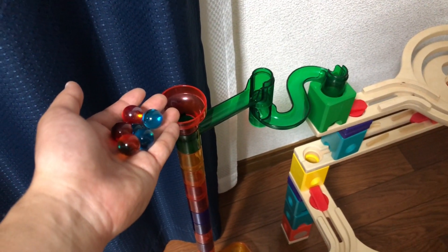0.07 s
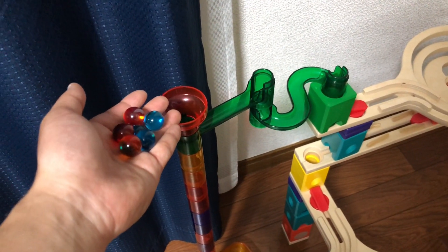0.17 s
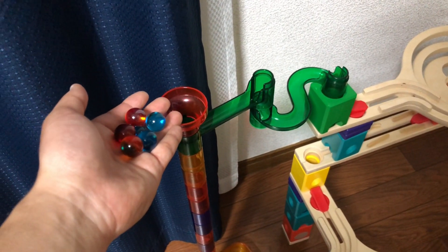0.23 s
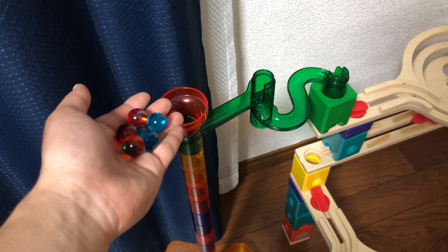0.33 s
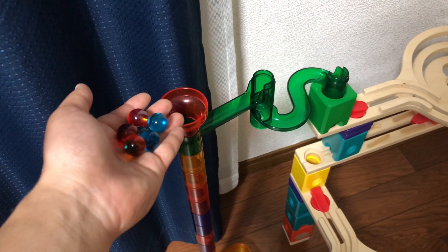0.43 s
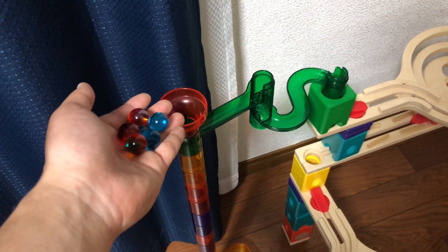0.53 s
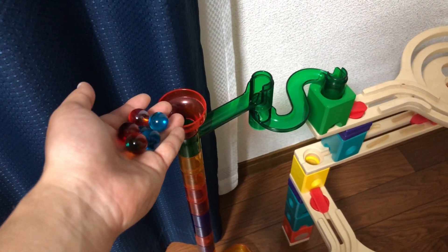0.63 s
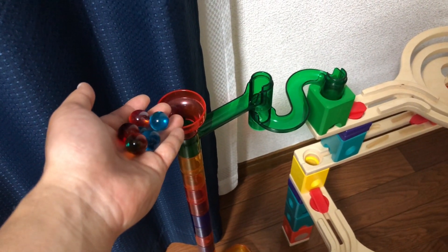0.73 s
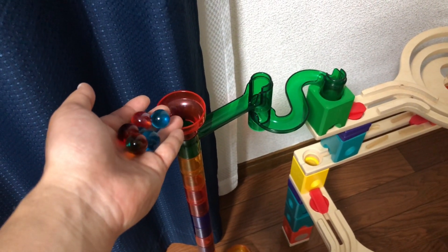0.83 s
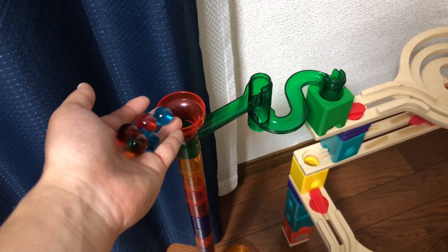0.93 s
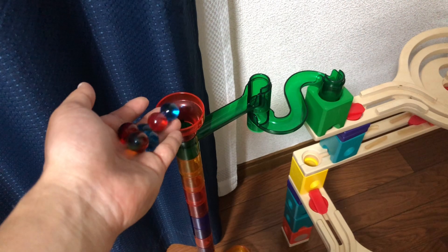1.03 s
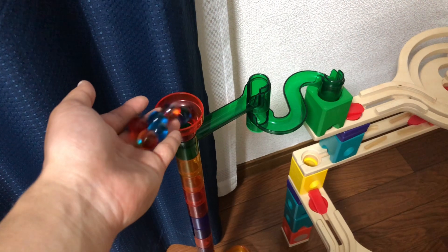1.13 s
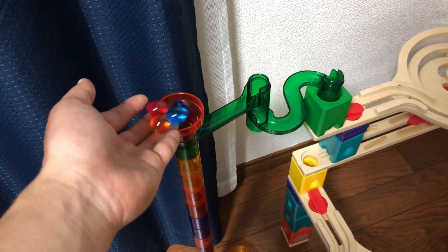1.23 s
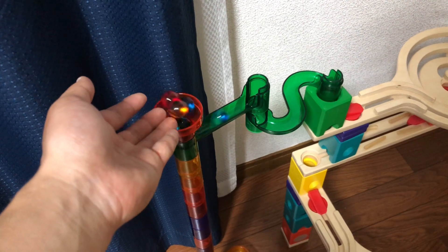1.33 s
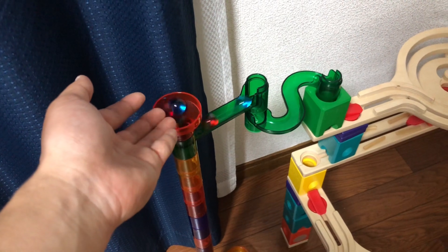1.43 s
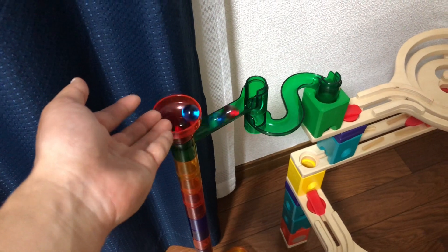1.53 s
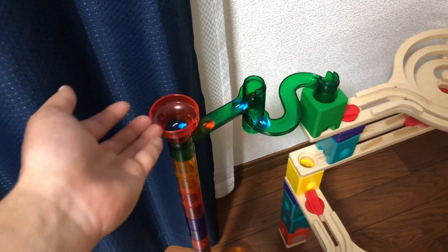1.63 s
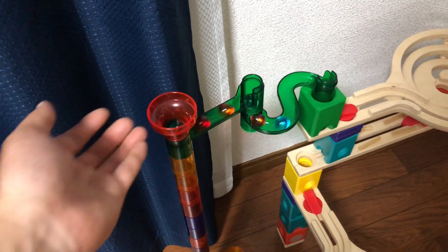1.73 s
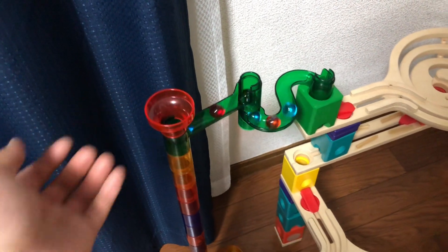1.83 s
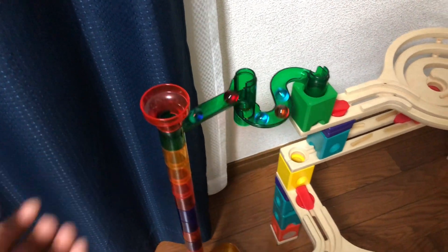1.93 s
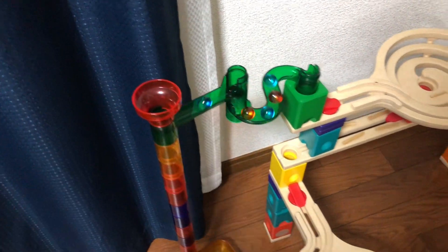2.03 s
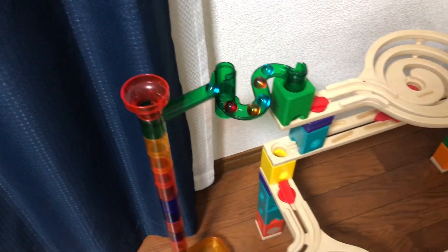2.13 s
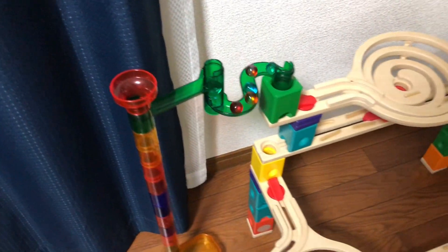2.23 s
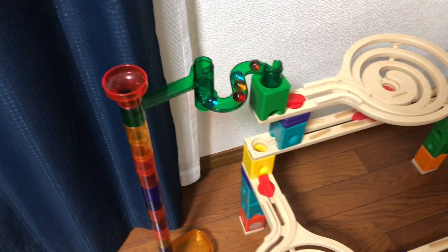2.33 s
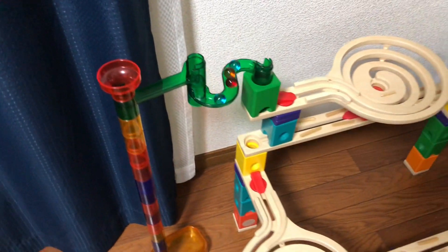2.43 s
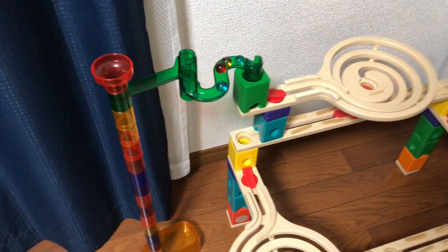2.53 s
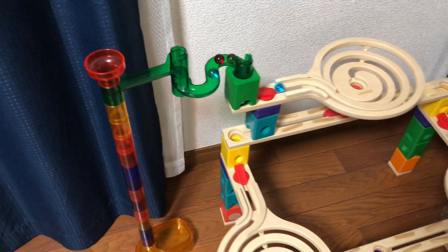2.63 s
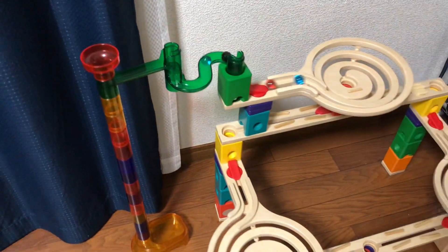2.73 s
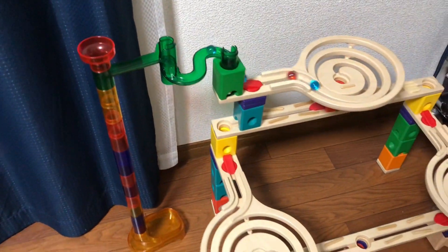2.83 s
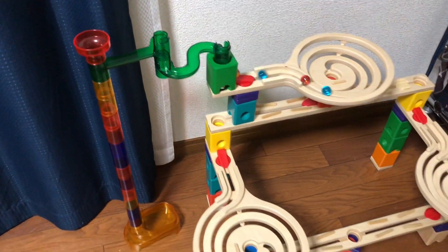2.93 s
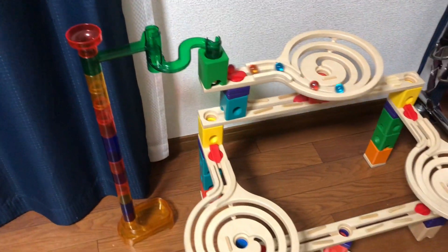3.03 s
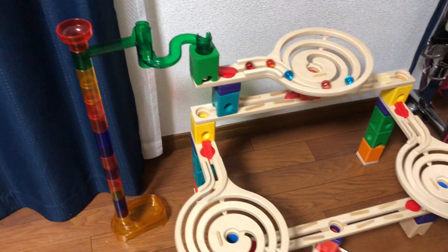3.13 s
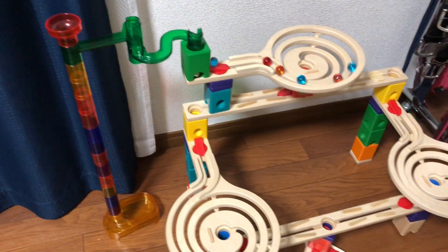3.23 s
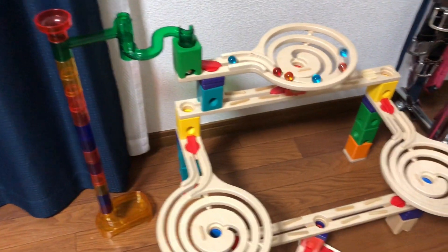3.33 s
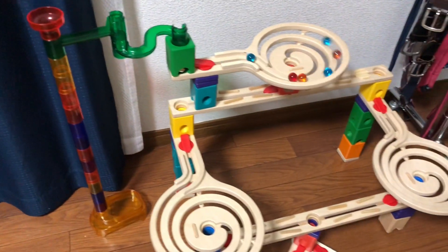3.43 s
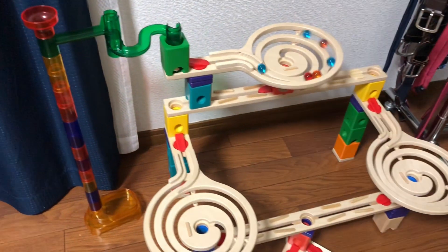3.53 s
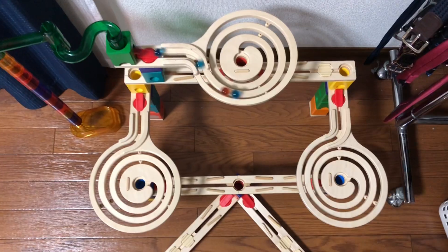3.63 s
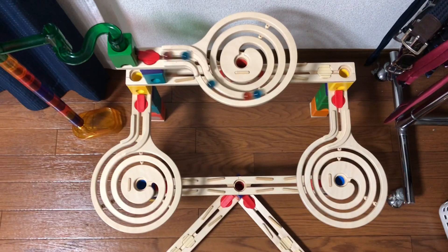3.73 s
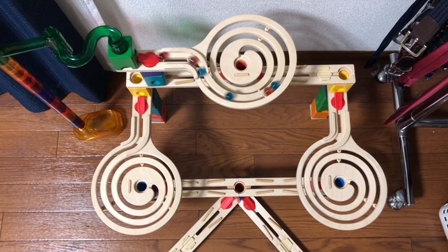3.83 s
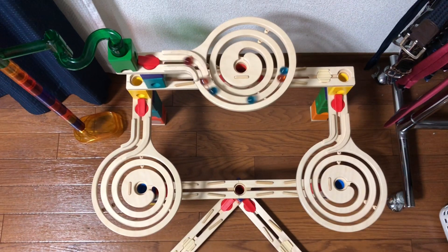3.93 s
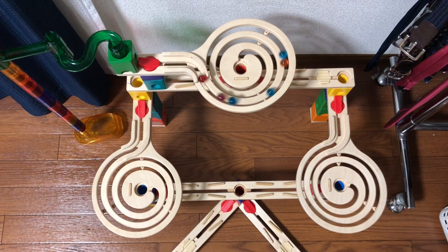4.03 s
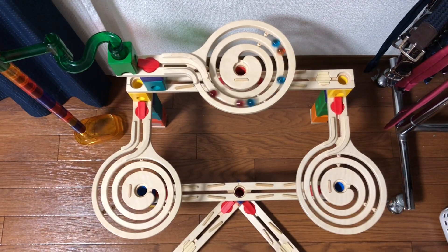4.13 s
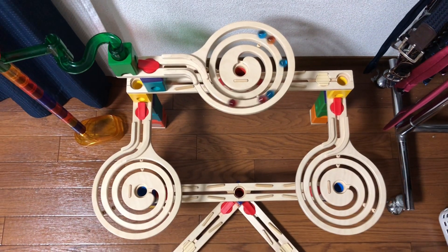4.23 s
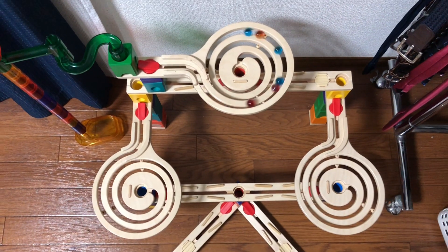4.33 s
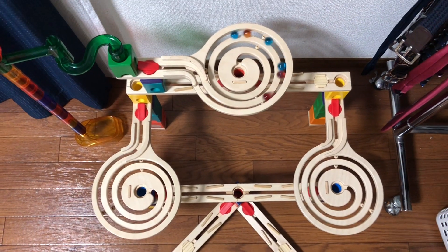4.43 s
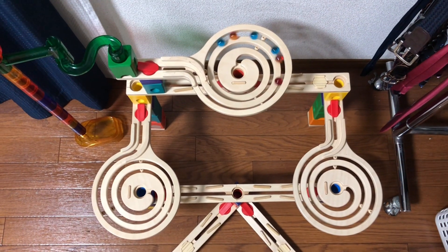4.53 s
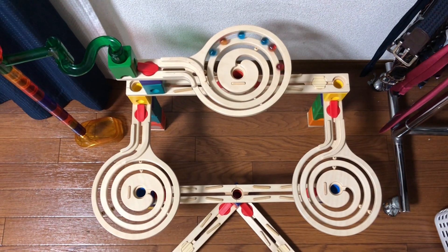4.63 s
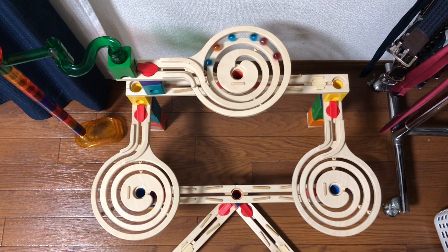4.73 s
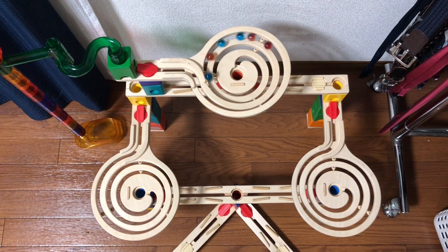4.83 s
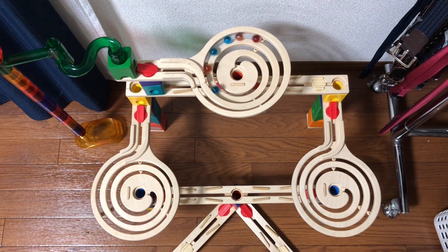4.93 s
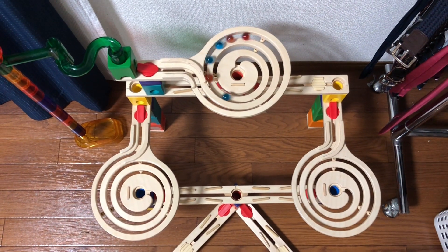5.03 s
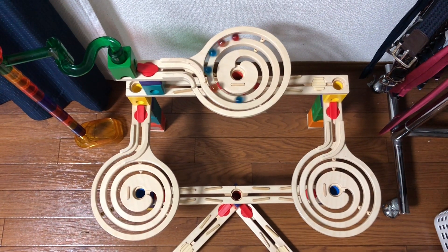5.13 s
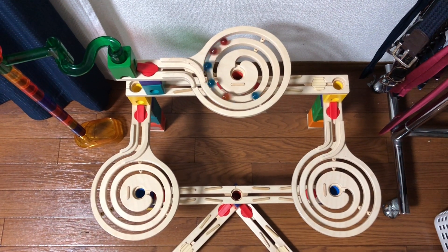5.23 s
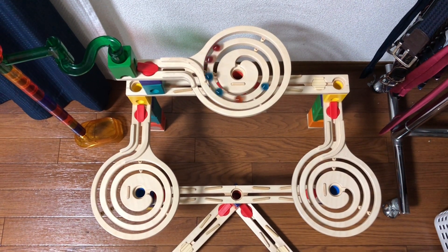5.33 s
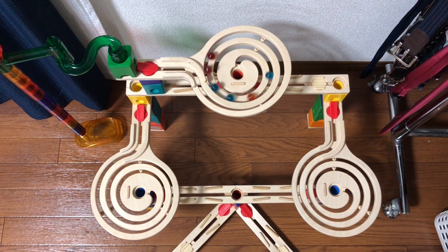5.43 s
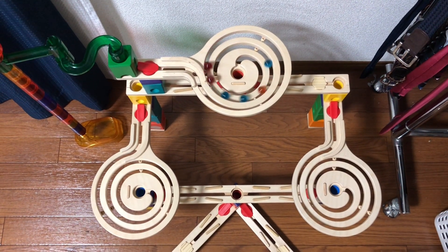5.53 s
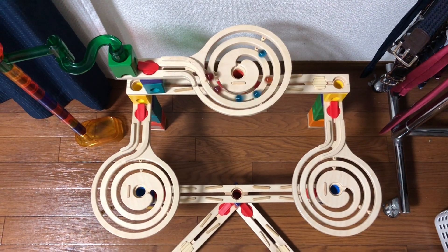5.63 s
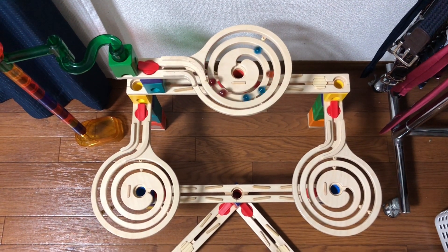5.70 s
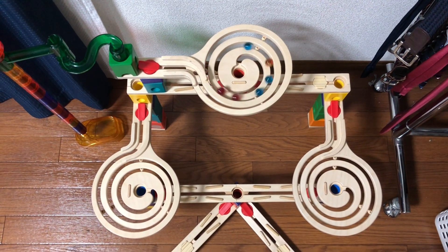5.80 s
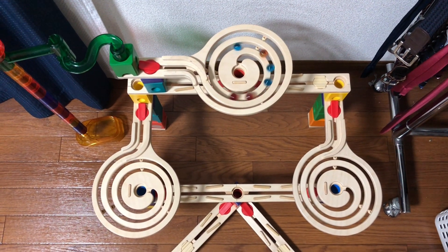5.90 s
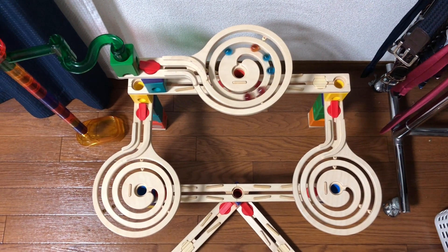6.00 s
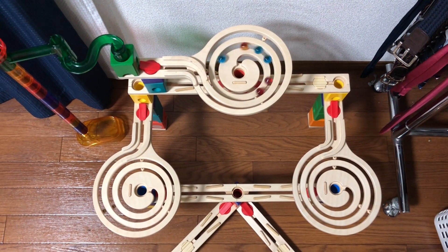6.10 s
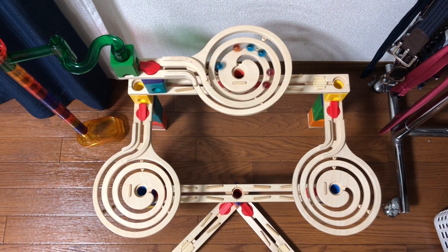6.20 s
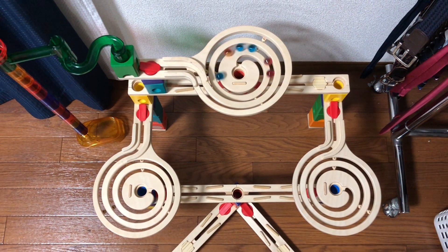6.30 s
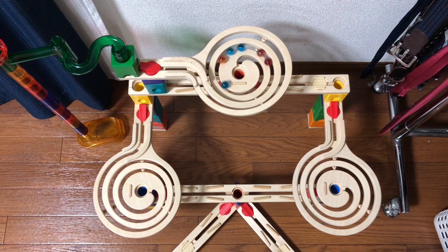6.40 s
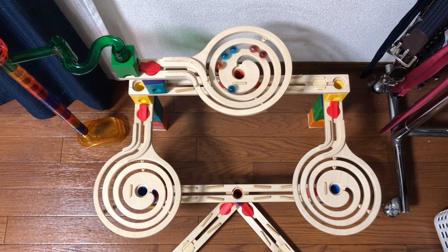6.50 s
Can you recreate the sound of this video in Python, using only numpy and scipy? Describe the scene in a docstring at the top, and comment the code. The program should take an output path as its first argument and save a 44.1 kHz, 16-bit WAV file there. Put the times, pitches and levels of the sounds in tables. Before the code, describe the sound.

Near silence, then hard little marble ticks and a sudden loud rattle of thin plastic, sharp cracks over hollow knocks and a low tower rumble. Spaced clacks follow as each marble bounces onto wood. Gritty scraping and side knocks give way to soft rolling with a purring hum that gradually sinks in pitch. Heard by a phone close by, in a small room with a short reverberation.

```python
"""Quiet room air, then marbles click and rub in a palm and clatter through a plastic funnel and chute.
One by one they drop through a block onto a wooden rail, then circle a wooden spiral with a sinking hum.
Blows are noise cracks over decaying modes; rattle and grit are showers of tiny noise bursts.
Rolling is a rough surface read at the marble's speed, with tones at the rate of the tool marks.
A phone hears it from close by in a small room."""
import sys
import numpy as np
from scipy import signal
from scipy.fft import rfft, irfft, next_fast_len
from scipy.io import wavfile
from scipy.ndimage import uniform_filter1d, map_coordinates

SR = 44100
rng = np.random.default_rng(int(sys.argv[2]) if len(sys.argv) > 2 else 0)


def master_out(mix):
    """Clip the mix to full scale and print it as 16-bit PCM to the path in sys.argv[1]."""
    frames = np.transpose(np.atleast_2d(mix))
    ceiling = np.clip(frames, -1, 1)
    pcm = np.round(ceiling * 32767).astype(np.int16)
    wavfile.write(sys.argv[1], SR, pcm)


N = 289296
TIME = np.arange(N) / SR
RING = TIME[:int(.25 * SR)]  # time axis of a single blow
DIRECT_DB = -6.5  # trim on a ring as it leaves the part, before the room adds its share


def undb(db):
    """Decibels to gain."""
    return 10 ** (np.asarray(db) / 20)


def unit(x):
    """Scale to rms 1."""
    return x / np.sqrt(np.mean(x ** 2) + 1e-18)


def unit_blow(x):
    """Scale to rms 1 over the first hundredth of a second."""
    return x / np.sqrt(np.mean(x[:SR // 100] ** 2))


def add(track, s, sound):
    """Mix a sound in at time s."""
    i = int(s * SR)
    track[i:i + len(sound)] += sound[:N - i]


def follow(points):
    """Straight lines through (s, value) points, over the whole scene."""
    return np.interp(TIME, *np.transpose(points))


def colour(x, points):
    """Causal minimum-phase filter with the (Hz, dB) response, built by folding its cepstrum."""
    size = next_fast_len(len(x) + 4096) // 2 * 2
    hz, db = np.transpose(points)
    f = np.maximum(np.fft.rfftfreq(size, 1 / SR), 1)
    cepstrum = irfft(np.log(undb(np.interp(np.log(f), np.log(hz), db))))
    cepstrum[1:size // 2] *= 2
    cepstrum[size // 2 + 1:] = 0
    return irfft(rfft(x, size) * np.exp(rfft(cepstrum)))[:len(x)]


def fade(t60):
    """Exponential decay of a ring, down 60 dB after t60 seconds."""
    return np.exp(-np.log(1000) * RING / t60)


def envelope(start_s, attack_s, hold_s, fall_db_per_s):
    """Gain that rises, holds and dies away."""
    age = TIME - start_s
    fall_db = fall_db_per_s * np.maximum(age - attack_s - hold_s, 0)
    return np.clip(age / attack_s, 0, 1) * undb(-fall_db)


def walk(rate):
    """Smooth random wander with a spread near 1, taking rate new values a second."""
    knots = rng.standard_normal(2048)
    path = np.interp(TIME * rate, np.arange(len(knots)), knots)
    return uniform_filter1d(path, int(SR / rate / 2) + 1) * np.sqrt(2)


def grains(points, rate, spread_db, t60):
    """Tiny impacts of uneven size at random moments, rate a second, each a brief coloured burst."""
    size = (rng.random(N) < rate / SR) * undb(spread_db * np.clip(rng.standard_normal(N), -2, 2))
    decay = np.exp(-2 * np.log(1000) / (t60 * SR))
    energy = signal.lfilter([1], [1, -decay], size ** 2 + 1e-12)
    return unit(colour(np.sqrt(energy) * rng.standard_normal(N), points))


def ping(hz, t60):
    """A single mode."""
    return fade(t60) * np.sin(2 * np.pi * hz * RING)


def ring(modes, spread):
    """Modes of a struck part; each spot of contact weights and detunes them anew."""
    hz, db, t60 = np.transpose(modes)[:, :, None]
    weight, detune = rng.standard_normal((2, len(modes), 1))
    weight = np.sign(weight) * (.5 + np.abs(weight))
    tones = np.sin(2 * np.pi * hz * (1 + spread * detune) * RING)
    return unit_blow(np.sum(weight * undb(db) * fade(t60) * tones, axis=0))


def crowd(points, t60):
    """Many short-lived modes, too close to tell apart."""
    return unit_blow(colour(rng.standard_normal(len(RING)) * fade(t60), points))


def patchy(x, spread_db):
    """Each point of contact favours some third-octaves and misses others."""
    hz = np.geomspace(1000, 16000, 13)
    return colour(x, np.column_stack([hz, spread_db * rng.uniform(-1.7, 0.68, len(hz))]))


# Basic colour of a hard crack. Each row: frequency in Hz, level in dB.
CRACK_COLOUR = [(300, -25), (1500, -26), (3000, -13), (5500, 4), (8000, 4), (11200, 7.5), (12500, 1.5),
                (16000, -9.5)]


def tick(t60, hz, dull_db):
    """Noise crack of hard contact; time in contact dulls it above its centre, by dull_db at 2.5 times hz."""
    crack = colour(rng.standard_normal(len(RING)) * fade(t60), CRACK_COLOUR)
    crack = colour(crack, [(hz / 2, -4), (hz, 0), (1.1 * hz, 0), (2.5 * hz, dull_db)])
    return unit(crack) * np.sqrt(np.mean(fade(t60) ** 2)) / 2


# Spectrum of the room's background. Each row: frequency in Hz, relative level in dB per Hz.
AIR_COLOUR = [(15, -53), (25, -20.5), (76, -2), (120, -15.5), (180, -9), (200, -8), (317, -15.5),
              (516, -17.5), (796, -22.5), (1440, -26), (6050, -36), (9320, -35.5), (16000, -46.5)]
AIR_DB = -67.5


def air():
    """Quiet background of the room: coloured noise that drifts gently in level."""
    return undb(AIR_DB + 0.77 * walk(2.395)) * unit(colour(rng.standard_normal(N), AIR_COLOUR))


# The palm tilts and the marbles rub ever louder until they tip into the funnel.
POUR_S, RUB_DB, RUB_RISE_DB_PER_S = 1.19, -50.5, 128
# Marble meeting marble, in the palm and later on the track. Each row: start in seconds, peak in dB.
MARBLE_CLICKS = [(1.0441, -31), (1.0984, -29.5), (1.1092, -28), (1.1136, -12.5), (1.1273, -25),
                 (1.1376, -18), (1.142, -11), (1.1452, -16), (1.1487, -20.5), (1.1513, -22.5), (1.155, -12),
                 (1.1817, -24), (3.4751, -30), (4.3506, -32.5)]
# Colour of such a click. Each row: frequency in Hz, level in dB.
CLICK_COLOUR = [(500, -26.5), (1500, -24.5), (3000, -14.5), (5500, -2.5), (8000, 5.5), (11000, 1.5),
                (12500, -7), (16000, -15)]


def palm():
    """Marble against marble: dry, tiny ticks, and a faint rubbing in the tilting palm."""
    rub_colour = [(1000, -21.0), (3000, -5.5), (8000, 1.5), (16000, -15.0)]
    rub_db = RUB_DB - RUB_RISE_DB_PER_S * np.abs(POUR_S - TIME)
    out = undb(rub_db) * grains(rub_colour, rate=700, spread_db=3.0, t60=0.0038)
    for s, db in MARBLE_CLICKS:
        contact = (RING == 0) + .17 * rng.standard_normal(len(RING)) * fade(.0035)
        click = colour(contact, CLICK_COLOUR)
        add(out, s, undb(db) * click / np.abs(click).max())
    return out


# Modes of the deep wall and of the shell. Each row: frequency in Hz, level in dB, t60 in seconds.
WALL_MODES = [(860, -20.5, 0.029), (936, -4.5, 0.18), (1006, -2, 0.1), (1160, -5.5, 0.07),
              (1285, -6.5, 0.15), (1305, 4, 0.027), (1464, -13, 0.026), (1728, 0, .06), (1860, -5, 0.042)]
SHELL_MODES = [(1966, -4, 0.066), (2330, 0.5, 0.076), (2560, -0.5, 0.053), (2805, -5, 0.06),
               (2700, 6.5, 0.013), (3170, 2.5, 0.038), (3330, -6, 0.064), (3330, -3, 0.047),
               (3570, -8.5, .05), (3920, -4, .04), (4960, -2, 0.051), (4540, -4.5, 0.023)]
# The crowd of short-lived modes between them. Each row: frequency in Hz, level in dB.
WALL_COLOUR = [(100, -36), (450, -30.5), (750, 0.5), (1000, 7), (1800, 7.5), (2600, -31), (6000, -49)]
SHELL_COLOUR = [(700, -43.5), (1600, -15.5), (2300, 2.5), (3200, 2.5), (4000, -3), (5000, -3.5), (7500, -2),
                (16000, -14.5)]
# Trims of the parts of a blow; the spot is the struck spot's own note.
CHUTE_TICK_DB, SHELL_DB, WALL_DB, SPOT_DB = -2, 0.5, -2.5, -6.5
# The wall answers less further down the chute, and less to a sharp blow (dB per dB of tick over ring).
WALL_FALL_DB_PER_S, WALL_PER_SHARP = 7.5, -0.1027


def plastic_blow(s, tick_db, ring_db, hz, spot_hz):
    """One blow at time s cracks and rings the thin plastic; each spot has its own note and colour."""
    crack = tick(t60=.011, hz=hz, dull_db=-2) + undb(-9) * ping(hz, t60=.018)
    shell = ring(SHELL_MODES, spread=.018) + undb(4) * crowd(SHELL_COLOUR, t60=0.024)
    shell = unit_blow(patchy(shell, spread_db=2.8))
    wall = unit_blow(ring(WALL_MODES, spread=0.007) + undb(-0.5) * crowd(WALL_COLOUR, t60=0.0319))
    wall_db = WALL_DB - WALL_FALL_DB_PER_S * (s - POUR_S) + WALL_PER_SHARP * (tick_db - ring_db)
    spot = unit_blow(ping(spot_hz, t60=.028))
    body = undb(SHELL_DB) * shell + undb(wall_db) * wall + undb(SPOT_DB) * spot
    return undb(tick_db + CHUTE_TICK_DB) * crack + undb(DIRECT_DB + ring_db) * body


# The loudest blows on the funnel and chute. Each row: time in seconds, tick level in dB and ring level
# in dB (both before trims), tick centre in Hz, note of the struck spot in Hz.
CHUTE_BLOWS = [(1.1932, -3.5, -21, 9050, 3660), (1.211, -12, -23, 10600, 3130),
               (1.254, -3.5, -27, 11530, 1150), (1.261, -17, -21.5, 5870, 1320),
               (1.2771, -14, -24.5, 10000, 1240), (1.285, -9, -18, 8500, 3500),
               (1.3102, -5, -20.5, 8870, 1300), (1.3265, -15, -27, 6150, 950),
               (1.351, -3, -26.5, 9600, 1310), (1.3663, -5.5, -22, 11600, 988),
               (1.3798, -8, -23.5, 6140, 1315), (1.3879, -23, -22.5, 9400, 930),
               (1.4026, -5.5, -35.5, 9720, 955), (1.424, -9, -20.5, 9500, 970),
               (1.4531, -6, -25.5, 9600, 1330), (1.4824, -27, -22, 4370, 2420),
               (1.493, -9.5, -19, 9340, 1780), (1.5134, -6.5, -22.5, 8650, 2840),
               (1.5295, -12, -32, 8750, 990), (1.5369, -14.5, -26, 8400, 2290),
               (1.5421, -4.5, -20.5, 5000, 2730), (1.563, -13, -24.5, 6000, 2700),
               (1.585, -14, -26, 10500, 1250), (1.6011, -5.5, -17.5, 11670, 2650),
               (1.616, -11, -19.5, 7600, 2540), (1.6404, -8.5, -26.5, 7240, 3300),
               (1.6473, -9.5, -20.5, 6740, 2250), (1.6606, -11, -21, 5030, 2290),
               (1.67, -21, -23, 9250, 2280), (1.6781, -14, -18, 10900, 2810), (1.691, -7, -18, 7400, 983),
               (1.711, -25, -22.5, 6900, 2660), (1.721, -20.5, -29, 7610, 2720),
               (1.733, -11, -21.5, 7660, 2470), (1.7499, -6.5, -20, 5040, 2680),
               (1.7623, -7.5, -19.5, 8100, 2580), (1.7773, -11.5, -19.5, 5250, 2590),
               (1.8068, -16, -24.5, 4600, 2500), (1.815, -11.5, -26, 10560, 960),
               (1.828, -9, -19, 7500, 2390), (1.837, -24, -21.5, 7500, 1250),
               (1.8489, -17, -21, 4170, 3710), (1.8627, -10.5, -21.5, 9530, 2610),
               (1.8686, -10.5, -21.5, 8840, 2420), (1.874, -11, -19.5, 10650, 2400),
               (1.8963, -5.5, -16.5, 4960, 2730), (1.9703, -6, -18, 7570, 2480),
               (1.982, -15, -30, 7300, 2330), (1.994, -25.5, -26.5, 7040, 2380),
               (2.0071, -15.5, -24.5, 10000, 2320), (2.02, -18, -24.5, 11900, 2300),
               (2.0263, -17, -24.5, 9800, 2300), (2.0575, -7.5, -17, 5170, 2690),
               (2.08, -29, -27.5, 5960, 2450), (2.1002, -36, -33, 5630, 3240),
               (2.1322, -12.5, -18, 10900, 2560), (2.139, -9.5, -24, 10300, 3200),
               (2.172, -8.5, -19.5, 5030, 2550), (2.2505, -9, -20, 4990, 990),
               (2.2629, -13.5, -24.5, 7450, 985), (2.3068, -11, -18.5, 7600, 3300),
               (2.3128, -12, -22, 5230, 1750), (2.34, -14, -30.5, 10600, 1280),
               (2.353, -10, -20, 7060, 2700)]
# Between the blows: rattle of the plastic, rumble of the tower. Each row: frequency in Hz, level in dB.
RATTLE_COLOUR = [(400, -26), (750, -0.5), (950, 3.5), (1300, -7), (1550, -10), (2400, 5), (3300, 2.5),
                 (4200, 3), (7500, -9), (11200, -0.5), (12500, -10), (16000, -20.5)]
RUMBLE_COLOUR = [(40, -44), (85, -8), (115, 6.5), (138, 7.5), (168, -6), (200, 4), (240, -3.5), (320, -13),
                 (360, -4.5), (430, -20.5), (650, -14), (1000, -42.5)]
RATTLE_DB, RUMBLE_DB = -38, -44.5
# After a blow with a tick above HARD_DB the marble lands once more, softer; REBOUND_S is the mean gap.
HARD_DB, REBOUND_S, REBOUND_TICK_DB, REBOUND_RING_DB = -11, 0.0055, -11.5, -12.5


def chute():
    """Hard blows and their rebounds, over a rattle of plastic and a rumble of the tower that die away."""
    out = np.zeros(N)
    for s, tick_db, ring_db, hz, spot_hz in CHUTE_BLOWS:
        add(out, s + .001, plastic_blow(s, tick_db, ring_db, hz, spot_hz))
        if tick_db > HARD_DB:
            again_s = s + REBOUND_S * (.5 + rng.random())
            again = plastic_blow(s, tick_db + REBOUND_TICK_DB, ring_db + REBOUND_RING_DB, hz, spot_hz)
            add(out, again_s, again)
    rattle = envelope(POUR_S, attack_s=0.18, hold_s=0.38, fall_db_per_s=33.5)
    rattle = rattle * grains(RATTLE_COLOUR, rate=320, spread_db=8, t60=0.00847)
    rumble = envelope(POUR_S, attack_s=0.031, hold_s=0.51, fall_db_per_s=25)
    rumble = rumble * grains(RUMBLE_COLOUR, rate=560, spread_db=0.5, t60=.02)
    return out + undb(RATTLE_DB) * rattle + undb(RUMBLE_DB) * rumble


# Landings in the throat of the funnel. Each row: time in seconds, tick level in dB, clack of the throat
# in dB, knock of the deep wall in dB, all before trims.
LANDINGS = [(1.2325, -8, -15.5, -17.5), (1.3398, -13.5, -17.5, -16.5), (1.448, -5, -17.5, -19),
            (1.573, -30, -19.5, -18), (1.6351, -27.5, -16, -18.5), (1.8013, -29.5, -17, -17.5)]
# Modes of the throat. Each row: frequency in Hz, level in dB, t60 in seconds.
THROAT_MODES = [(2360, -4.5, 0.0162), (2930, 3, .012), (3250, -2.5, 0.019), (3583, -6, .02),
                (4495, -6, .028)]
# The deep wall gives way a moment after the clack, with one note added to its modes.
WALL_LAG_S, WALL_NOTE_HZ, WALL_NOTE_DB = 0.001955, 1300, -1.5


def funnel():
    """Each marble lands in the throat of the funnel: a bright clack, then a hollow knock of the wall."""
    out = np.zeros(N)
    for s, tick_db, clack_db, wall_db in LANDINGS:
        crack = undb(tick_db + CHUTE_TICK_DB) * tick(t60=.011, hz=10000, dull_db=-3)
        add(out, s, crack + undb(DIRECT_DB + clack_db) * ring(THROAT_MODES, spread=0.01))
        wall = ring(WALL_MODES, spread=.005) + undb(-0.5) * crowd(WALL_COLOUR, t60=.018)
        wall = wall + undb(WALL_NOTE_DB) * unit_blow(ping(WALL_NOTE_HZ, t60=.03))
        add(out, s + WALL_LAG_S, undb(DIRECT_DB + wall_db) * unit_blow(wall))
    return out


# Low modes of the tower. Each row: frequency in Hz, level in dB, t60 in seconds.
TOWER_MODES = [(78, -8.5, 0.17), (112.6, -14, 0.052), (136, -8.5, 0.051), (162.3, -8, 0.045),
               (204, 4.5, 0.12), (232, -4, 0.1), (285, -2, 0.082), (355.6, -17.5, 0.091)]
# Marbles drop down the upright tube and thud through the tower. Each row: time in seconds, level in dB.
THUDS = [(1.97, -38.5), (2.058, -47), (2.1316, -34.5)]
TOWER_DB = -57  # hum of the tower while marbles run along the rail


def tower():
    """The tower thuds as marbles drop down the tube, and hums unevenly in its modes during the rail run."""
    body = sum(undb(db) * ping(hz, t60) for hz, db, t60 in TOWER_MODES)
    shaking = unit(signal.fftconvolve(rng.standard_normal(N), body)[:N])
    swell = envelope(MARBLES[0][0], attack_s=0.034, hold_s=.7, fall_db_per_s=56)
    out = undb(TOWER_DB) * swell * undb(3 * walk(22)) * shaking
    for s, db in THUDS:
        add(out, s, undb(db) * unit_blow(body) * (1 - fade(.033)))
    return out


# The upright tube of the chute: a marble enters, the tube's note, the width of that note, its level.
TUBE_S, TUBE_HZ, TUBE_WIDTH_HZ, TUBE_DB = 1.972, 2330, 70, -24


def tube():
    """A marble whirls down the upright tube of the chute, a resonance that sings at its own note."""
    whirl = envelope(TUBE_S, attack_s=.01, hold_s=0.044, fall_db_per_s=220)
    whirl = whirl * grains(SHELL_COLOUR, rate=460, spread_db=6, t60=.004)
    return undb(TUBE_DB) * signal.lfilter(*signal.iirpeak(TUBE_HZ, TUBE_HZ / TUBE_WIDTH_HZ, fs=SR), whirl)


# Modes of the wood. Each row: frequency in Hz, level in dB, t60 in seconds.
WOOD_MODES = [(1380, -9.5, 0.078), (1686, -4, 0.05), (2126, -1, 0.088), (3005, 4, 0.033), (3554, 4, .02),
              (4680, 8.5, 0.025), (5570, 4, 0.045), (6740, 8, 0.026)]
# The crowd of short-lived modes between them. Each row: frequency in Hz, level in dB.
WOOD_COLOUR = [(250, -22), (600, -14), (1200, -8.5), (2000, 2), (3200, 2), (4500, 0.5), (7000, -6.5),
               (10500, -10), (16000, -18.5)]


def wood_blow(tick_db, hz, wood_db, wood_hz, thump_db, support):
    """One blow on wood; each spot has its own note, and the modes of the support answer late and low."""
    crack = tick(t60=0.0089, hz=hz, dull_db=-21) + undb(-7) * ping(hz, t60=0.014)
    # the softer the contact, the more the one note stands out from the other modes
    note = undb(1.0 + 0.89 * (wood_db - tick_db)) * unit_blow(ping(wood_hz, t60=0.0227))
    wood = ring(WOOD_MODES, spread=.05) + undb(-2) * crowd(WOOD_COLOUR, t60=0.037)
    wood = unit_blow(patchy(wood, spread_db=2.5) + note)
    thump = ring(support, spread=0.012) * (1 - fade(0.023))
    return undb(tick_db) * crack + undb(DIRECT_DB) * (undb(wood_db) * wood + undb(thump_db + 5.5) * thump)


# The marbles. Each row: drop into the block in seconds, hit on its wall in seconds, landing on the rail
# in seconds, second landing in seconds, strength in dB of all blows but the first landing, strength of
# that landing in dB, share of the lead speed, rolling level in dB.
MARBLES = [(2.391, 2.391, 2.4149, 2.4563, -1, -8.5, 0.98, 2.5),
           (2.523, 2.5317, 2.5506, 2.588, 0, 1, 0.98, 1),
           (2.7202, 2.722, 2.7435, 2.7792, -1, -0.5, 0.85, -3),
           (2.81, 2.816, 2.8366, 2.8737, -0.5, 0.5, 0.89, -3.5),
           (2.898, 2.9014, 2.9239, 2.9651, -1, -1.5, 0.9, -8),
           (3.058, 3.064, 3.0825, 3.1189, -0.5, 0, 0.79, -7)]
# The block's ring when a marble hits its inner wall. Each row: frequency in Hz, level in dB, t60 in seconds.
BLOCK_MODES = [(6000, -5.5, .022), (6700, -0.5, .03), (10900, -13, .025)]
BLOCK_DB = -29
# The four blows of every marble, before its own strength. Each row: tick level in dB, tick centre in Hz,
# wood ring in dB, wood note in Hz, tower thump in dB.
BOUNCES = [(-7.5, 10500, -23.5, 2700, -47.5), (-15, 6650, -29, 3140, -41.5),
           (-14.5, 9900, -24.5, 1715, -42.5), (-17.5, 6550, -26.5, 3330, -40.5)]
# Knocks against the sides of the rail and the spiral, before trims. Each row: time in seconds,
# strength in dB, wood note in Hz, tick level in dB, tick centre in Hz.
KNOCKS = [(2.47, -34, 3030, -35, 6630), (2.4951, -30.5, 3370, -31, 4570), (2.5957, -31, 2820, -34, 6580),
          (2.61, -22.5, 3100, -22.5, 6450), (2.6248, -32, 3100, -46, 6490), (2.6339, -24, 1476, -41, 5900),
          (2.6343, -30.5, 3070, -53.5, 7000), (2.6429, -31, 3150, -53, 7000),
          (2.644, -34.5, 1440, -50, 7000), (2.6887, -30, 2070, -30, 4460), (2.7054, -21.5, 3130, -23, 6300),
          (2.766, -27.5, 2110, -31, 10500), (2.8593, -28, 2000, -33, 6380), (2.8856, -26, 3130, -29, 6200),
          (2.9407, -33, 2930, -26, 6460), (2.954, -39, 2075, -36, 6550), (2.9888, -25.5, 3200, -33, 6000),
          (3.0095, -28, 3140, -39, 4900), (3.029, -33.5, 2050, -40, 4500), (3.0691, -29.5, 1490, -23, 6000),
          (3.268, -20.5, 3160, -21, 5980), (3.2909, -26.5, 1283, -35.5, 7310),
          (3.3062, -34, 2990, -53, 4600), (3.355, -37, 3100, -52, 5060), (3.502, -43, 2800, -48, 6200),
          (3.5982, -30.5, 3130, -48, 6800), (3.6039, -23, 3100, -15.5, 7200),
          (3.6103, -24, 2060, -23.5, 6640), (3.6307, -26, 1750, -36, 5930),
          (3.6368, -30.5, 1913, -44, 5900), (3.662, -21, 3170, -25, 5470), (3.668, -27.5, 2170, -31, 4800),
          (3.68, -34, 1550, -42, 5900), (3.692, -37, 3070, -49, 5000), (3.71, -35, 3075, -52, 5900),
          (3.7412, -37, 3100, -56, 4660), (3.777, -22.5, 3230, -24, 5300), (3.7947, -31.5, 3070, -46, 4690),
          (3.8578, -31, 1400, -47, 6290), (3.885, -44, 3093, -50, 5000), (3.92, -36.5, 1902, -49, 5960),
          (4.643, -41, 2300, -56, 4700)]
KNOCK_WOOD_DB, KNOCK_TICK_DB, KNOCK_THUMP_DB = -4.5, 3.5, -18
# Modes of the spiral's disc. Each row: frequency in Hz, level in dB, t60 in seconds.
DISC_MODES = [(85, -7, 0.12), (114, -9.5, .07), (163, -0.5, .06), (218.5, 6.5, 0.06), (290.4, 4, 0.13),
              (404, -11.5, .05), (475, -14, .05)]
ON_SPIRAL_S = 3.2  # from here on knocks shake the disc instead of the tower


def rail():
    """Marbles bounce one by one through the block onto the rail, then knock its sides and the spiral."""
    out = np.zeros(N)
    for *times, drop_db, landing_db, _, _ in MARBLES:
        add(out, times[1], undb(BLOCK_DB + drop_db) * ring(BLOCK_MODES, spread=.008))
        strengths = drop_db, drop_db, landing_db, drop_db
        for s, db, (tick_db, hz, wood_db, wood_hz, thump_db) in zip(times, strengths, BOUNCES):
            spot = 1 + 0.035 * rng.standard_normal()
            blow = wood_blow(tick_db, hz * spot, wood_db, wood_hz * spot, thump_db, TOWER_MODES)
            add(out, s, undb(db) * blow)
    for s, db, wood_hz, tick_db, hz in KNOCKS:
        support = TOWER_MODES if s < ON_SPIRAL_S else DISC_MODES
        wood_db, thump_db = db + KNOCK_WOOD_DB, db + KNOCK_THUMP_DB
        add(out, s, wood_blow(tick_db + KNOCK_TICK_DB, hz, wood_db, wood_hz, thump_db, support))
    return out


# Crackle of grit, and the wooden frame under the marbles. Each row: frequency in Hz, level in dB.
GRIT_COLOUR = [(800, -8.5), (2500, 3), (4300, -4), (6500, -10), (9000, -8), (11000, -14), (12500, -27.5),
               (16000, -46)]
FRAME_COLOUR = [(40, -37), (62, -13), (80, 3), (110, 2), (150, -9), (200, -5), (295, -6), (420, -14),
                (700, -21), (1200, -51)]
SCRAPE_DB, GRIT_DB, RAIL_RUMBLE_DB = -50.5, -59, -67.5
# The last marble's chatter between the edges of the groove. Each row: frequency in Hz, level in dB.
CHATTER_COLOUR = [(400, -9.5), (900, -0.5), (1500, 9), (2100, 0), (2600, 1), (3150, 16), (3800, -12),
                  (7000, -7.5), (10500, -18), (14000, -34)]
CHATTER_S, CHATTER_DB = 3.6, -50


def grit():
    """Noise grains: a scrape after each drop, crackle and rumble on the rail, a chatter into the spiral."""
    scrapes = [envelope(row[0], attack_s=.02, hold_s=0.035, fall_db_per_s=99.5) for row in MARBLES]
    scrape = np.sqrt(sum(gain ** 2 for gain in scrapes))
    first_s = MARBLES[0][0]
    along = envelope(first_s, attack_s=0.45, hold_s=1.03, fall_db_per_s=21.0)
    crackle = undb(SCRAPE_DB) * scrape + undb(GRIT_DB) * along
    crackle = crackle * grains(GRIT_COLOUR, rate=680, spread_db=7.5, t60=0.016)
    chatter = envelope(CHATTER_S, attack_s=0.0082, hold_s=0.046, fall_db_per_s=50.0)
    chatter = chatter * grains(CHATTER_COLOUR, rate=300, spread_db=5.5, t60=.012)
    shaking = envelope(first_s, attack_s=.1, hold_s=1.8, fall_db_per_s=6)
    rumble = undb(RAIL_RUMBLE_DB) * shaking * grains(FRAME_COLOUR, rate=540, spread_db=1.5, t60=.02)
    return crackle + undb(CHATTER_DB) * chatter + rumble


# Lead rate of crossing the groove's tool marks; each marble runs at its share. Each row: time in seconds,
# rate in Hz.
LEAD_SPEED = [(2.4, 215.2), (3.4, 250), (3.62, 298.2), (4.1, 280.3), (4.8, 236.6), (5.7, 187.4),
              (6.56, 179.5)]
# Fine roughness of the groove as heard at REFERENCE_HZ. Each row: frequency in Hz, level in dB.
GROOVE = [(50, -12.5), (110, 1), (220, 0), (290, -2.5), (380, -9), (470, -9), (560, -10.5), (700, -6.5),
          (880, -0.5), (1300, 1), (1600, -12), (1980, -7), (2250, -18), (2900, -19), (5000, -26.5),
          (9000, -56)]
REFERENCE_HZ = 197.9
# Level of the hum, strongest in the wide outer turn. Each row: time in seconds, level in dB.
HUM_LEVEL = [(3.1, -71), (3.55, -66), (3.68, -60), (4.82, -61), (4.95, -64.5), (5.7, -69), (6.2, -61.5),
             (6.56, -66)]
HUM_LEAD = 1.5  # dB of hum per dB of rolling, so the heaviest-running marble leads
RAIL_TIME_S = .55  # from the drop until a marble reaches the grooved spiral and its hum fades in
# Level of the rolling: sinks as the marbles slow, swells in the tight inner turns. Each row: time in
# seconds, level in dB.
ROLL_LEVEL = [(3.75, -52), (4.01, -53), (5.03, -55.5), (5.6, -53.5), (6.1, -52), (6.56, -52)]
# Rasp of fine specks, stronger in the inner turns. Each row: time in seconds, dB relative to the rolling.
RASP_LEVEL = [(3.4, -14), (4.7, -15), (5.6, -11.5), (6.56, -13)]
# Colour of the specks. Each row: frequency in Hz, level in dB.
SPECK_COLOUR = [(800, -6.5), (1700, 7.5), (2000, 8.5), (2200, 3), (2500, 9), (2800, 1.5), (3300, 3),
                (3750, -2.5), (4200, 0.5), (5000, -4.5), (6300, -4), (8000, -16), (16000, -64)]
SPECK_DB = -18.5  # lone specks ticking under the marbles, relative to the rolling
RASP_FLUTTER_DB, ROAR_FLUTTER_DB = 2.5, 0.6


def spiral():
    """Tool marks hum and buzz and wood grain roars in step with each marble's speed; specks rasp and tick."""
    lead_hz = follow(LEAD_SPEED)
    groove_hz, groove_db = np.transpose(GROOVE)
    surface = unit(colour(rng.standard_normal(N), GROOVE))
    hum, buzz, roar = 0, 0, 0
    for drop_s, *_, share, db in MARBLES:
        on_wood = undb(db) * np.clip((TIME - drop_s) / 0.1, 0, 1)
        marks = np.cumsum(lead_hz * share * (1 + .01 * walk(7))) / SR  # tool marks crossed so far
        phase = 2 * np.pi * marks
        in_spiral = np.clip((TIME - drop_s - RAIL_TIME_S) / 0.77, 0, 1)
        hum += in_spiral * undb(HUM_LEAD * db + 2 * walk(35)) * np.sin(phase + 0.5 * walk(45))
        for k in range(4, 8):
            harmonic_db = np.interp(k * REFERENCE_HZ, groove_hz, groove_db)
            buzz += on_wood * undb(harmonic_db) * walk(18) * np.sin(k * phase)
        # read the looped surface from a random start, faster when the marble is faster
        place = (marks * SR / REFERENCE_HZ + N * rng.random()) % N
        grain = map_coordinates(surface, [place], order=3, mode="wrap")
        # the marble presses harder and lighter as it wobbles between the edges of the groove
        roar += on_wood * undb(2.9 * np.clip(walk(200), -2, 2)) * grain
    # rough patches of wood make the roar flutter, and the rasp still more
    patches = np.clip(walk(90), -1.6, 1.6)
    started = TIME > MARBLES[0][0]
    rasp = undb(RASP_FLUTTER_DB * patches) * grains(SPECK_COLOUR, rate=520, spread_db=3, t60=.004)
    ticks = grains(SPECK_COLOUR, rate=70, spread_db=3.2, t60=.003)
    specks = started * (undb(SPECK_DB) * ticks + undb(follow(RASP_LEVEL)) * rasp)
    rolling = undb(ROAR_FLUTTER_DB * patches) * unit(unit(roar) + undb(-9.0) * unit(buzz)) + specks
    return undb(follow(HUM_LEVEL)) * unit(hum) + undb(follow(ROLL_LEVEL)) * rolling


# Reflections by band. Each row: centre in Hz, t60 in seconds, echo level in dB.
ROOM_BANDS = [(124.4, 0.18, -0.5), (396, 0.097, -4), (1200, 0.51, -8), (3030, 0.25, -8.5), (6950, 0.19, -9),
              (13970, 0.21, -11)]


def echo():
    """One pattern of reflections from floor, walls and furniture: banded noise, each band with its decay."""
    centres = np.log([row[0] for row in ROOM_BANDS])
    f = np.log(np.maximum(np.fft.rfftfreq(len(RING), 1 / SR), 1))
    noise, tail = rfft(rng.standard_normal(len(RING))), 0
    for pick, (_, t60, db) in zip(np.eye(len(ROOM_BANDS)), ROOM_BANDS):
        shape = fade(t60) * np.clip((RING - .002) / 0.0025, 0, 1)
        band = irfft(noise * np.interp(f, centres, pick), len(RING))
        tail += undb(db) * band * shape / np.linalg.norm(shape)
    return tail


ROOM_CHANGE_S = .12  # the reflections renew this often as the marbles and the phone move


def room(x):
    """Adds a short diffuse tail, crossfading from one pattern of reflections to the next."""
    out, hop = x.copy(), int(ROOM_CHANGE_S * SR)
    for i in range(0, N - hop, hop):
        piece = x[i:i + 2 * hop]
        piece = piece * np.hanning(2 * hop)[:len(piece)]
        add(out, i / SR, signal.fftconvolve(piece, echo()))
    return out


def scene():
    """The whole run in its room, as one channel."""
    run = palm() + chute() + funnel() + tower() + tube() + rail() + grit() + spiral()
    return (air() + room(run))[None]


SILENCE_S = (3.577, 3.597)  # start and end of a brief dropout
LOW_CUT_HZ, TOP_HZ = 65, 16000


def record(dry):
    """The sound drops out for an instant; the phone cuts the deep bass and the top."""
    live = uniform_filter1d(1. * ((TIME < SILENCE_S[0]) | (TIME > SILENCE_S[1])), size=64)
    thin = signal.sosfilt(signal.butter(2, LOW_CUT_HZ, "high", fs=SR, output="sos"), dry)
    return signal.sosfilt(signal.ellip(8, .2, 70, TOP_HZ, fs=SR, output="sos"), thin * live)


dry = scene()
out = record(dry)
master_out(out)
```